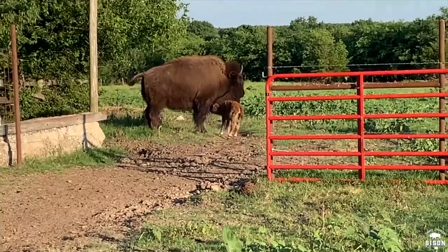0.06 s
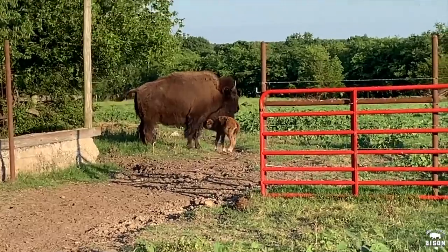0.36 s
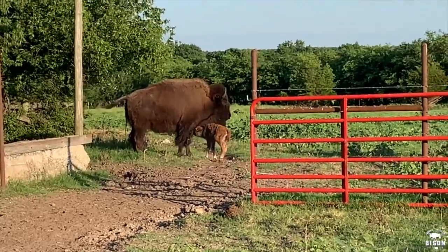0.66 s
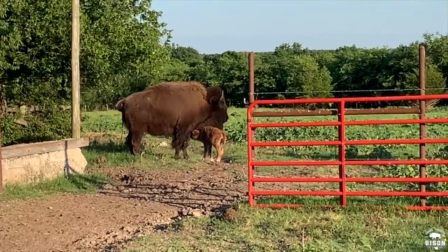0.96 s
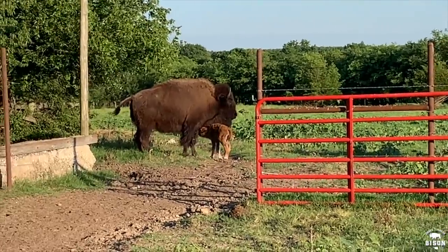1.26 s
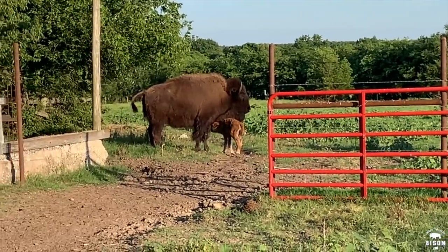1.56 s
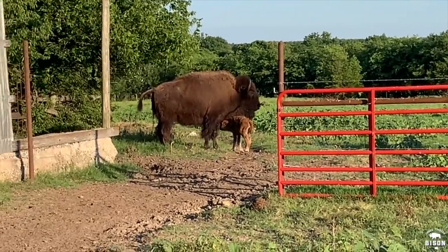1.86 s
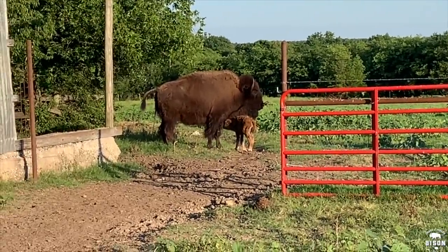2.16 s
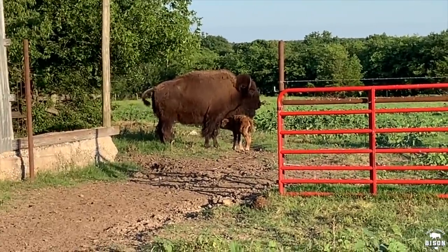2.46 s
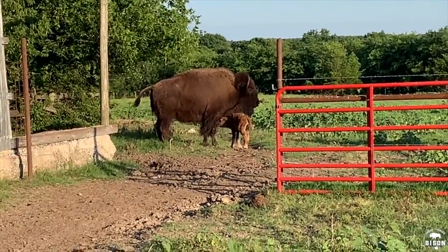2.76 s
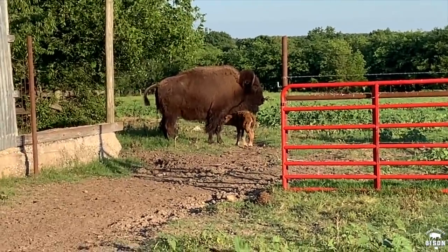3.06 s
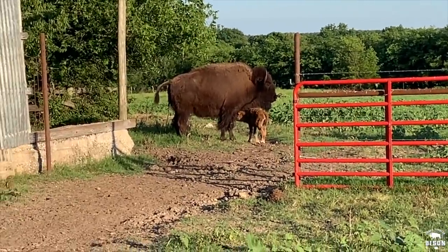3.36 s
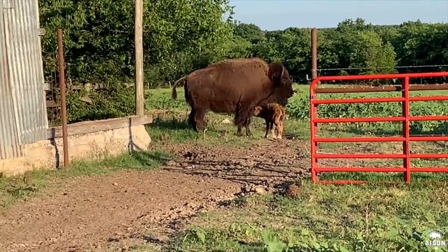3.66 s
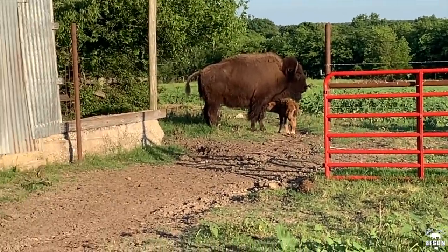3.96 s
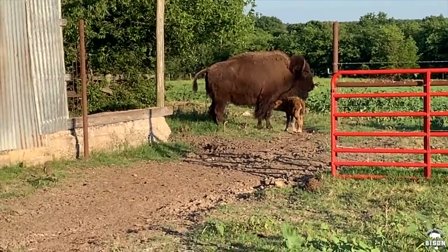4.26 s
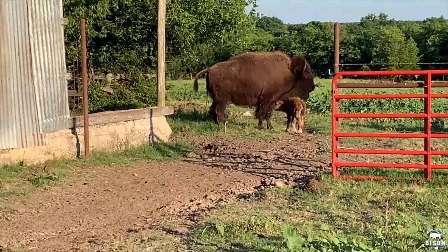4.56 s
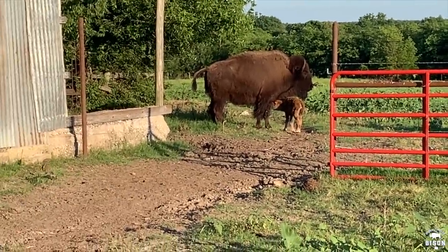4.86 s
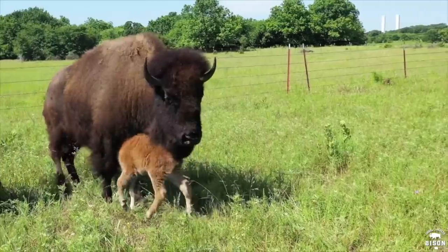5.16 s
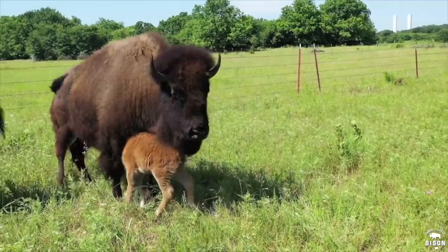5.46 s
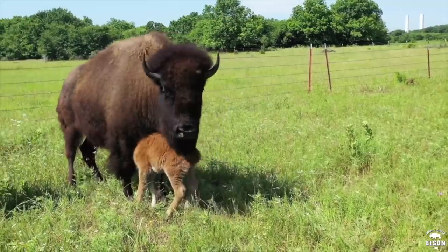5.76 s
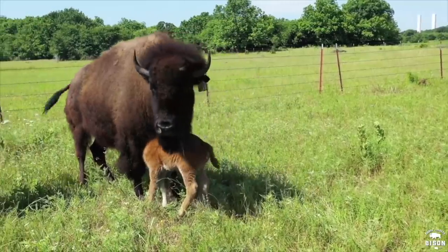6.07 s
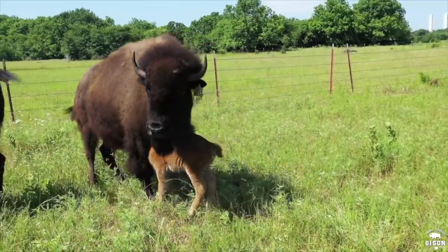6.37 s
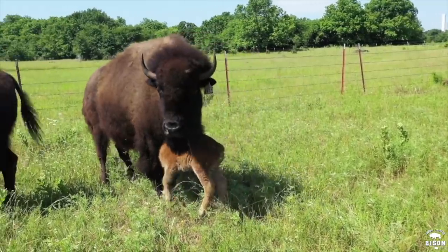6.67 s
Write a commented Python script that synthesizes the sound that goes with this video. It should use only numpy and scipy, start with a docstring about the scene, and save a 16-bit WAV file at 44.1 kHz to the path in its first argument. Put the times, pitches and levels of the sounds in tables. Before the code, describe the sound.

Outdoors, close to an idling engine, a loping exhaust throb mixes with fan noise and quick metallic ticks, and wind nudges the microphone now and then. The engine cuts off abruptly and the place changes to a quiet meadow. A short hard gust and a bump strike the microphone, leaving soft airy hiss, a thin insect buzz and little birds chirping toward the right.

```python
"""Idling engine, then open pasture

Close on an eight-cylinder engine: uneven firings make a loping throb at the tailpipe, valves and
knocks ring the metal, and a breeze nudges the microphone. The sound stops dead. After an instant of
silence we stand in a pasture: one hard gust and a handling bump hit the microphone, an insect rubs
out a high buzz, and small birds chirp, mostly to the right, over a soft hiss of air."""
import sys
import numpy as np
from scipy import signal
from scipy.fft import rfft, irfft
from scipy.io import wavfile
from scipy.ndimage import map_coordinates

SR = 44100
rng = np.random.default_rng(int(sys.argv[2]) if len(sys.argv) > 2 else 0)


def generate_wav(sig):
    """Save sig (samples, or channels by samples) to the path in sys.argv[1] as 16-bit PCM at SR."""
    pcm = np.round(np.clip(np.atleast_2d(sig).T, -1, 1) * 32767).astype(np.int16)
    wavfile.write(sys.argv[1], SR, pcm)


N = 299880
T = np.arange(N) / SR
HZ = np.fft.rfftfreq(N, 1 / SR)

# engine speed, hunting around idle: time_s, four_stroke_cycles_per_s
ENGINE_SPEED = [(0, 9.846), (.44, 10.383), (1.06, 10.101), (1.4, 10.77), (1.95, 10.287), (2.5, 10.372),
                (3.3, 10.058), (3.69, 10.641), (3.99, 10.203), (4.93, 10.345)]


def gain_of(db):
    """Decibels to a factor."""
    return 10 ** (np.asarray(db) / 20)


def unit_rms(x):
    """Scales to an rms of 1."""
    return x / np.sqrt(np.mean(x ** 2) + 1e-20)


def curve(rows, column=1):
    """One column of a time table at every sample."""
    rows = np.asarray(rows)
    return np.interp(T, rows[:, 0], rows[:, column])


def spectrum(points):
    """A spectrum table at every frequency."""
    hz, value = np.transpose(points)
    return np.interp(np.log(HZ + 1), np.log(hz), value)


def pan(left_db):
    """Left and right gains for a level difference."""
    return gain_of(np.array([[left_db], [-left_db]]) / 2)


def drift(hz):
    """Random wandering slower than about hz, rms 1."""
    return unit_rms(irfft(rfft(rng.standard_normal(N)) * np.exp(-(HZ / hz) ** 2), N))


def noise(colour_db, likeness):
    """Coloured stereo noise of given left-right likeness, rms 1."""
    left, other = rfft(rng.standard_normal((2, N)))
    likeness = np.clip(likeness, -1, 1)
    right = likeness * left + np.sqrt(1 - likeness ** 2) * other
    return unit_rms(irfft(np.array([left, right]) * gain_of(colour_db), N))


def pulses(cycles):
    """One impulse as each cycle is completed."""
    return np.diff(np.floor(cycles), prepend=np.floor(cycles[0]))


def resonate(x, hz, width_hz):
    """A steep resonance: two damped ringers in a row."""
    pole = np.exp((2j * np.pi * hz - np.pi * width_hz) / SR)
    return signal.lfilter([1], np.poly([pole, pole]), x).real


def swell(start_s, length_s, rise_s, fall_s):
    """An envelope that rises, holds and dies away."""
    return np.clip((T - start_s) / rise_s, 0, 1) * np.exp(-np.maximum(T - start_s - length_s, 0) / fall_s)


def scatter(x, t60_s):
    """Dense echoes that die away, different on each side."""
    tail = rng.standard_normal((2, SR)) * gain_of(-60 * T[:SR] / t60_s)
    tail /= np.linalg.norm(tail, axis=1, keepdims=True)
    return signal.fftconvolve(x * np.ones((2, 1)), tail, axes=1)[:, :N]


def exhaust(cycles, uneven_db=.6, jitter_cycles=.002):
    """Eight firings a cycle, unequal in spacing and strength; the pipe passes only their bass."""
    # firings at the tailpipe, strong ones and then a lull: place_cycles, relative_db
    firings = [(.065, 0), (.18, -7.5), (.3, -4.5), (.41, -11), (.52, -14.5), (.69, -7), (.83, -2),
               (.94, -9.5)]
    # what pipe and silencer let through: frequency_hz, relative_db
    pipe = [(20, -45.5), (31, -7), (41, 1.5), (95, 3), (108, -2.5), (123, -19), (160, -27.5), (200, -28),
            (500, -85)]
    # the throb, steady but for one dip: time_s, level_db
    level = [(0, -25), (3.6, -24.5), (4.1, -27.5), (4.47, -26), (4.6, -26), (4.75, -24.5)]
    puffs = np.zeros(N)
    for place, db in firings:
        since = cycles - place + jitter_cycles * drift(6)
        puffs += gain_of(db + uneven_db * drift(4.6)) * pulses(since)
    throb = -unit_rms(irfft(rfft(puffs) * gain_of(spectrum(pipe)), N))
    sway = 1 + .05 * np.array([drift(4), drift(4)])
    return throb * sway * gain_of(curve(level)) * pan(2.1)


def chug(cycles, rough=.3, left_lag_s=.0005):
    """Puffs of exhaust ring the silencer at the same places in every cycle: a pulsing hum."""
    # silencer rings: place_cycles, pitch_hz, width_hz, level_db
    chugs = [(.53, 315, 45, -48.5), (.81, 316.5, 38, -50), (.56, 472, 93, -55.5), (.78, 448, 34, -57)]
    hum = np.zeros((2, N))
    for place, hz, width, db in chugs:
        since = cycles - place + .005 * drift(6)
        puff = unit_rms(pulses(since)) + rough * rng.standard_normal((2, N))
        hum += gain_of(db) * unit_rms(resonate(puff, hz, width))
    hum[0] = np.roll(hum[0], int(left_lag_s * SR))
    return hum * pan(-2.5)


def valves(cycles, decay_cycles=.0089, uneven_db=2.3):
    """Valves snap shut in turn, each time a little harder or softer, and ring the rocker covers."""
    # dry metallic ticks: place_cycles, relative_db
    ticks = [(.01, -4), (.32, -1.5), (0.519, -4), (.585, 2.5), (0.663, 0.5), (.8, 1.5)]
    # rocker cover modes: pitch_hz, width_hz, level_db
    modes = [(1275, 160, -62.5), (2400, 130, -72.5), (3230, 330, -68.5), (3940, 280, -75),
             (4190, 67, -71.5)]
    blows = np.zeros(N)
    for place, db in ticks:
        since = cycles - place + .006 * drift(6)
        blows += gain_of(db) * np.exp(-(since % 1) / decay_cycles)
    grit = rng.standard_normal((2, N)) * blows * gain_of(uneven_db * drift(30))
    return sum(gain_of(db) * unit_rms(resonate(grit, hz, width)) for hz, width, db in modes)


def clatter(cycles, rough=.5, scrape_cycles=.05, facing_hz=1300, facing_width_hz=300):
    """Each knock is a tap and a short scrape that ring one engine part, never quite on time."""
    # knocks of every cycle: place_cycles, pitch_hz, width_hz, relative_db
    knocks = [(.37, 822, 65, -55.5), (.57, 1010, 50, -62), (.76, 1100, 60, -67), (.55, 1135, 26, -66),
              (.46, 1240, 85, -61.5), (.56, 1295, 85, -58.5), (.755, 1315, 80, -59), (1, 1285, 77, -60),
              (.37, 1675, 55, -61), (0.6, 1610, 50, -63.5), (.29, 1975, 80, -71.5), (.54, 1955, 66, -65),
              (.285, 2600, 80, -69)]
    # knocks near facing_hz dip and grow as the microphone turns: time_s, gain_db
    facing = [(0, 0.5), (3.1, -3), (3.6, 1.5), (4.9, 3.5)]
    out = np.zeros((2, N))
    for place, hz, width, db in knocks:
        since = cycles - place + .006 * drift(6)
        scrape = rng.standard_normal((2, N)) * np.exp(-(since % 1) / scrape_cycles)
        blow = unit_rms(pulses(since)) + rough * unit_rms(scrape)
        ring = resonate(blow, hz, width) * gain_of(.97 * drift(11))
        ring[0] = np.roll(ring[0], int(SR / hz / 4))  # a quarter period late on the left
        facing_share = np.exp(-abs(hz - facing_hz) / facing_width_hz)
        out += gain_of(db + facing_share * curve(facing)) * unit_rms(ring)
    return out * pan(.53)


def fan_and_gears(cycles, swing_db=.93, fan_db=-44, gears_db=-47, valve_db=-59.5):
    """Fan noise pulses with the cycle, the valve gear repeats its rattle, one valve ticks brightly."""
    # rush of fan and belts: frequency_hz, relative_db
    rush = [(25, -21.5), (60, -6), (130, -9), (230, -7), (380, -11), (500, -8), (660, -14.5), (900, -15),
            (1250, -16.5), (2000, -21.5), (4300, -33.5), (7000, -40), (9200, -53), (11000, -49.5),
            (13000, -64.5), (16000, -64)]
    # ringing engine covers: pitch_hz, width_hz, boost_db
    covers = [(790, 11, 7.5), (1008, 34, 8), (1258, 100, 5.5), (1620, 41, 5), (1754, 21, 5),
              (2370, 66, 6.5), (3033, 32, 11), (3570, 100, 5.5), (4170, 740, 4.5), (5900, 80, 4)]
    # stereo image of the fan: frequency_hz, left_right_likeness
    image = [(60, 0.69), (150, 0.32), (300, 0.51), (640, -1.04), (1400, 0.024), (3100, -0.65),
             (7000, 0.065), (15000, 0.9)]
    colour_db = spectrum(rush) + sum(db / (1 + (2 * (HZ - hz) / width) ** 2) for hz, width, db in covers)
    fan = noise(colour_db, spectrum(image)) * gain_of(fan_db + 1.9 * drift(30))
    # one loop of noise comes round every cycle, quickening with the engine
    loop_samples = int(SR / np.mean(curve(ENGINE_SPEED)))
    rattle = rng.standard_normal((2, loop_samples))[:, (cycles % 1 * loop_samples).astype(int)]
    gears = gain_of(gears_db) * unit_rms(irfft(rfft(rattle) * gain_of(colour_db), N))
    bright_db = colour_db - 40 / (1 + (HZ / 2600) ** 4)
    valve = noise(bright_db, 0) * gain_of(valve_db) * np.exp(-((cycles - .82) % 1) / .35)
    return (fan + gears) * gain_of(swing_db * np.cos(2 * np.pi * (cycles - .7))) + valve


def wall_echo(x, above_hz=600, level_db=-10):
    """The shed wall and the gate throw back the upper part of the sound."""
    upper = signal.sosfilt(signal.butter(2, above_hz, "high", fs=SR, output="sos"), x)
    return gain_of(level_db) * scatter(upper, t60_s=.12)


def breeze(calm_db=-34.5):
    """Lumpy rumble on the microphone that grows in puffs, and spells of rustling."""
    # colours of rumble and rustle: frequency_hz, relative_db
    rumble_colour = [(20, -30.5), (42, 1), (85, 10), (150, -7), (260, -14.5), (450, -41), (1000, -52),
                     (4000, -82)]
    rustle_colour = [(100, -24), (300, 5.5), (680, 3), (1100, -7), (2200, -17), (4000, -33), (12000, -48)]
    # puffs of breeze and spells of rustling: start_s, length_s, level_db
    puffs = [(2.243, 0.1, -30), (2.793, 0.24, -29), (3.2, 0.043, -30.5), (3.513, 0.6, -27.5),
             (4.511, 0.1, -24.5)]
    spells = [(0, 0.24, -46.5), (3.48, 0.25, -45.5), (4.36, 0.77, -41)]
    lumps, flutter = gain_of(1.2 * drift(18)), gain_of(2.2 * drift(25))
    puffing = sum(gain_of(db) * swell(s, length, rise_s=.024, fall_s=.059) for s, length, db in puffs)
    rustling = sum(gain_of(db) * swell(s, length, rise_s=.017, fall_s=.17) for s, length, db in spells)
    rumble = noise(spectrum(rumble_colour), .69) * (gain_of(calm_db) + puffing) * lumps
    return rumble + noise(spectrum(rustle_colour), .42) * rustling * flutter


def buffets(decay_s=.0033):
    """Single eddies thump the microphone."""
    # thumps of air: time_s, peak_db, pitch_hz
    thumps = [(2.726, -18, 137), (2.991, -17.5, 160), (3.578, -25, 168), (3.715, -14, 145),
              (3.841, -15.5, 170), (3.867, -13, 125), (3.971, -17.5, 185), (5.301, -13, 280)]
    return sum(gain_of(db) * np.exp(-abs(T - s) / decay_s) * np.cos(2 * np.pi * hz * (T - s))
               for s, db, hz in thumps)


def camera_knocks(scrape_s=.0027, rough=.19):
    """Small knocks, each a tap and a short scrape, ring the camera's case."""
    # knocks: time_s, level_db, brightness_db_per_octave
    taps = [(4.113, -27.5, -13), (4.262, -31.5, -8), (4.766, -34, -11), (5.0828, -16.5, -1),
            (5.091, -14, -15), (5.112, -21, -10.5)]
    # modes of the case: pitch_hz, relative_db, t60_s
    modes = [(718, -1, 0.017), (1080, -4, 0.029), (1370, -5.5, 0.025), (2120, -13, 0.016),
             (2620, -5, 0.032), (3160, -4.5, 0.02), (3740, -10.5, .008), (4560, -22, 0.016),
             (7000, -9, .008)]
    out, t = np.zeros(N), T[:SR // 8]
    for s, db, tilt_db in taps:
        blow = rough * rng.standard_normal(len(t)) * np.exp(-t / scrape_s)
        blow[0] = 1
        ring = sum(gain_of(mode_db + tilt_db * np.log2(hz / modes[0][0]) - 60 * t / t60)
                   * np.sin(2 * np.pi * hz * t) for hz, mode_db, t60 in modes)
        knock = signal.fftconvolve(blow / np.linalg.norm(blow), ring)[:len(t)]
        out[int(s * SR):][:len(t)] += gain_of(db) * knock
    return out * pan(-1)


def pasture_air(level_db=-42):
    """A soft, gently stirring hiss of open air, stronger on the right."""
    # the hiss: frequency_hz, relative_db
    colour = [(28, -13), (60, -3), (140, -2.5), (300, 4.5), (650, 6), (1200, 1.5), (2200, -3), (4000, -2),
              (6000, -4), (9000, -5.5), (11000, -6.5), (15500, -7)]
    # its stereo image: frequency_hz, left_right_likeness
    image = [(60, 0.61), (640, 0.36), (1400, 0.24), (3100, 0.011), (6800, 0.021), (15000, 0.34)]
    return gain_of(level_db + .4 * drift(6)) * noise(spectrum(colour), spectrum(image)) * pan(-4)


def insect(strokes_hz=49, depth=.34):
    """A meadow insect rubs its wings: quick strokes of high, narrow noise."""
    # the rasp: frequency_hz, relative_db
    colour = [(8000, -60), (10000, -14.5), (11200, -11.5), (11800, -2.5), (12200, -1.5), (12700, -5),
              (13500, -12), (15000, -15), (16000, -13.5)]
    # course of the song: time_s, relative_db, pitch_factor
    song = [(4.967, -41.5, 1), (5.2, -41, 1.015), (5.45, -40, 1.005), (5.8, -43, 1.005), (6.2, -41.5, 1),
            (6.5, -42, .99), (6.8, -40, 0.98)]
    phase = 2 * np.pi * np.cumsum(strokes_hz * (1 + .0369 * drift(1.16))) / SR
    strokes = 1 + depth * np.cos(phase) + .054 * np.cos(2 * phase)
    position = np.cumsum(curve(song, column=2))  # running through the noise faster raises its pitch
    rasp = np.array([map_coordinates(side, [position], order=5, mode="wrap")
                     for side in noise(spectrum(colour), .75)])
    return rasp * strokes * gain_of(curve(song) - 2.5) * pan(-1.8)


def gust(start_s=5.02, rise_s=.022, level_db=-16.5, sag_db_per_s=14.5, eddies_db=-25):
    """After weaker eddies a hard gust batters the microphone, sags and drops away."""
    # the gust: frequency_hz, relative_db
    colour = [(15, 2), (50, -0.5), (140, -1.5), (260, -15), (450, -26.5), (900, -41.5), (2000, -78),
              (8000, -82)]
    lumps = unit_rms(np.tanh(.5 * noise(spectrum(colour), 1)))  # peaks rounded off
    sag = gain_of(level_db - sag_db_per_s * (T - start_s))
    blow = sag * swell(start_s, length_s=.29, rise_s=rise_s, fall_s=.0014)
    eddies = gain_of(eddies_db) * (T < start_s + rise_s)
    return lumps * np.maximum(blow, eddies)


def handling_bump(bump_at_s=5.088, bump_db=-18.5, rise_s=.019, fall_s=.0045):
    """A handling bump on the microphone: a brief low swell of noise during the gust."""
    # the bump: frequency_hz, relative_db
    bump_colour = [(80, -18), (170, -1.5), (450, -1.5), (800, -6.5), (1300, -20), (3000, -24), (9000, -51)]
    envelope = np.exp(-abs(T - bump_at_s) / np.where(T < bump_at_s, rise_s, fall_s))
    return gain_of(bump_db) * envelope * noise(spectrum(bump_colour), 1)


def bird_note(start_s, length_s, from_hz, to_hz, db, waver, bend=.39, fade_db=0):
    """One quavering note that glides between two pitches; a positive bend hurries the glide's start."""
    out = np.zeros(N)
    at = np.arange(int(start_s * SR), min(int((start_s + length_s) * SR), N))
    progress = np.linspace(0, 1, len(at))
    glide = progress + bend * progress * (1 - progress)
    hz = (from_hz + (to_hz - from_hz) * glide) * (1 + .02 * waver[at])
    envelope = signal.windows.tukey(len(at), .4) * gain_of(db - fade_db * progress + 2.5 * waver[at])
    out[at] = envelope * np.sqrt(2) * np.sin(2 * np.pi * np.cumsum(hz) / SR)
    return out


def birds(gain_db=-4, near_echo_db=-2, trees_db=-7, call_every_s=.364):
    """Falling calls, slurs and chirps on the right; whistles further off, echoed by the tree line."""
    # quick downward slurs: start_s, length_s, from_hz, to_hz, relative_db
    slur_notes = [(5.239, 0.03, 5230, 3200, -37.5), (5.445, 0.035, 4020, 2650, -38),
                  (5.504, .02, 3810, 3180, -42), (5.587, .03, 3920, 2830, -38.5),
                  (5.632, 0.015, 3800, 3200, -44), (5.723, 0.029, 3800, 2800, -42),
                  (5.878, 0.023, 3440, 2870, -39.5), (5.94, 0.023, 3930, 2820, -43),
                  (5.967, .028, 3200, 2250, -46), (6.027, 0.0233, 3820, 3070, -43),
                  (6.048, 0.0268, 3330, 2400, -43.5), (6.129, 0.026, 4150, 3000, -41.5),
                  (6.154, 0.025, 3330, 2380, -44), (6.283, 0.028, 3750, 2330, -41.5),
                  (6.557, 0.034, 4350, 3780, -42)]
    # short rising chirps: start_s, from_hz, relative_db
    chirp_notes = [(5.387, 3590, -43), (5.519, 4430, -42), (5.653, 4420, -42), (5.786, 4350, -39),
                   (5.834, 4380, -43), (6.222, 2190, -44.5), (6.758, 4280, -45)]
    # nearly level whistles: start_s, length_s, pitch_hz, relative_db, left_over_right_db
    whistle_notes = [(5.305, 0.58, 3580, -54, -16), (5.858, 0.095, 3670, -38, -9),
                     (6.102, 0.038, 5050, -44, -3), (6.363, 0.08, 3660, -41.5, -6),
                     (6.454, 0.043, 4850, -41, 1)]
    waver = drift(290)
    # one bird repeats a falling call, fainter each time
    calls = sum(bird_note(5.128 + k * call_every_s, length_s=.125, from_hz=2530, to_hz=1720,
                          db=-30.5 - 3.5 * k, waver=waver, bend=.355, fade_db=18.5) for k in range(3))
    slurs = sum(bird_note(*row, waver, bend=-.09) for row in slur_notes)
    chirps = sum(bird_note(s, .033, hz, hz * 1.075, db, waver, bend=0) for s, hz, db in chirp_notes)
    whistles = sum(bird_note(s, length, hz, hz * .987, db, waver * .6, fade_db=5) * pan(side_db)
                   for s, length, hz, db, side_db in whistle_notes)
    near = (calls + slurs + chirps) * gain_of([[-12], [0]])
    echoes = gain_of(near_echo_db) * scatter(near, t60_s=.3)
    echoes += gain_of(trees_db) * scatter(whistles + chirps / 2, t60_s=1.3)
    return gain_of(gain_db) * (near + whistles + echoes)


def scene(yard_end_s=4.934, pasture_start_s=4.967):
    """The yard with its engine and an echo off the wall, then the pasture."""
    cycles = .072 + np.cumsum(curve(ENGINE_SPEED)) / SR
    machinery = clatter(cycles) + fan_and_gears(cycles)
    machinery = .95 * machinery + wall_echo(machinery)
    yard = exhaust(cycles) + chug(cycles) + valves(cycles) + machinery + breeze()
    pasture = pasture_air() + insect() + birds() + gust() + handling_bump()
    return yard * (T < yard_end_s) + pasture * (T > pasture_start_s) + buffets() + camera_knocks()


def record(dry, edge_hz=15760):
    """The recorder's band limit."""
    return signal.oaconvolve(dry, signal.firwin(1023, edge_hz, window=("kaiser", 9), fs=SR)[None], "same")


dry = scene()
out = record(dry)
generate_wav(out)
```